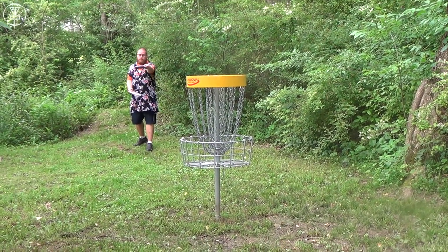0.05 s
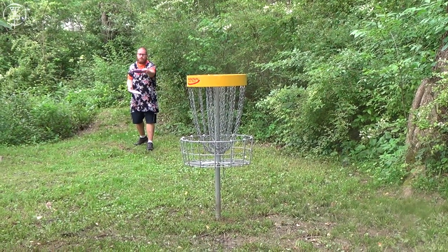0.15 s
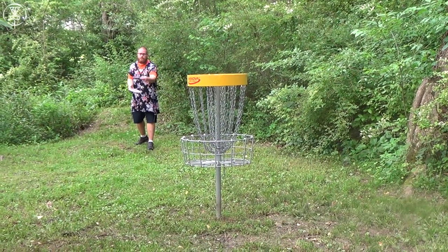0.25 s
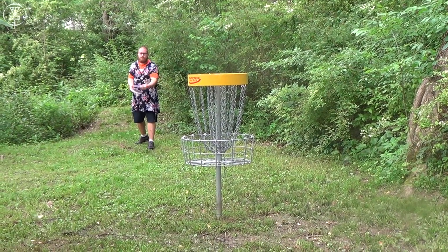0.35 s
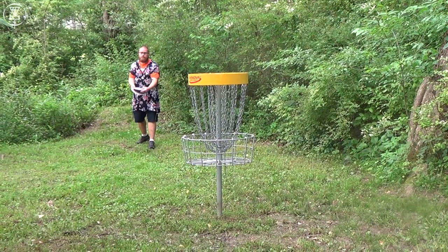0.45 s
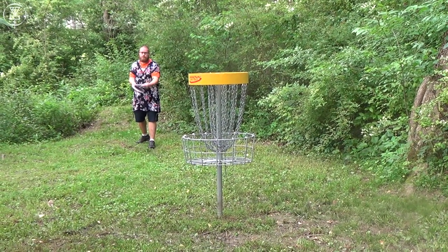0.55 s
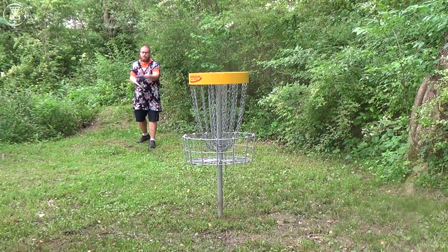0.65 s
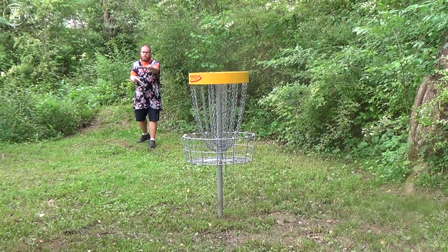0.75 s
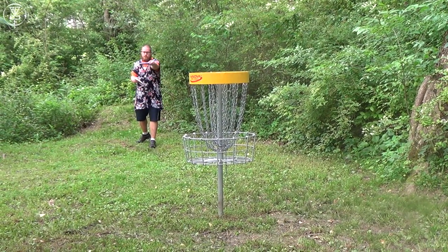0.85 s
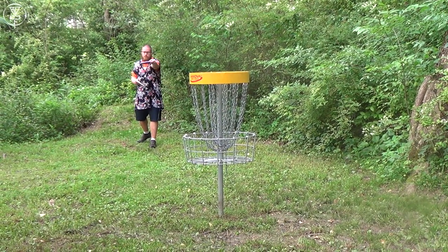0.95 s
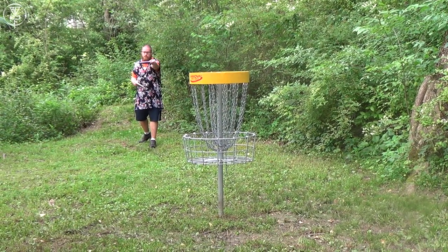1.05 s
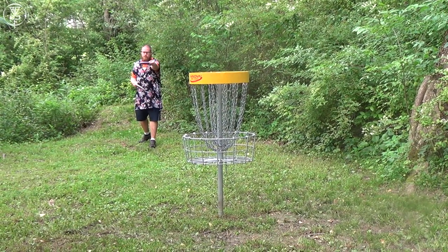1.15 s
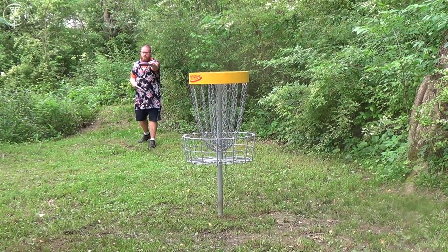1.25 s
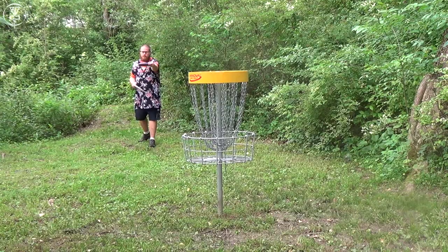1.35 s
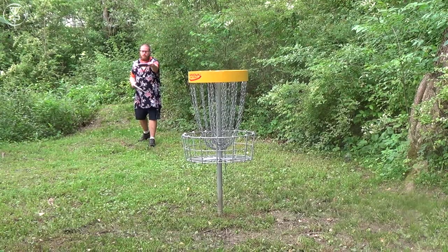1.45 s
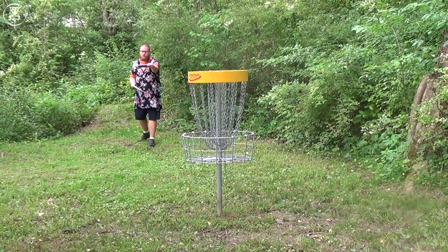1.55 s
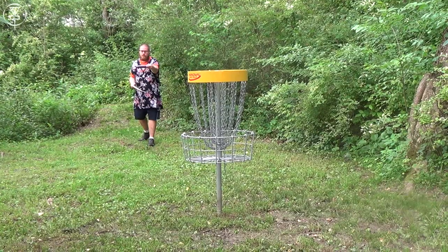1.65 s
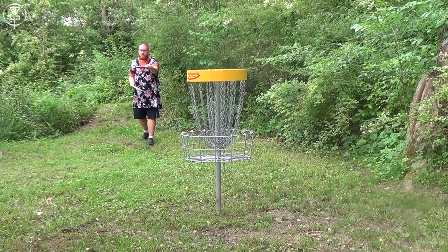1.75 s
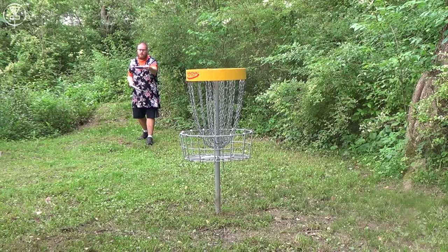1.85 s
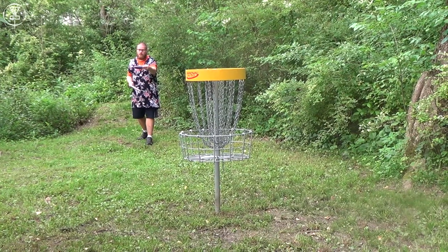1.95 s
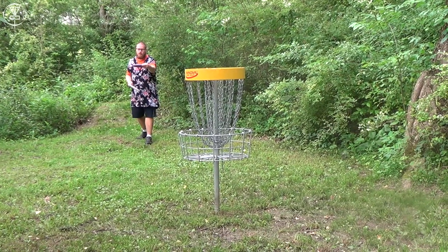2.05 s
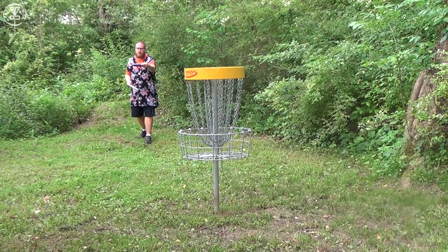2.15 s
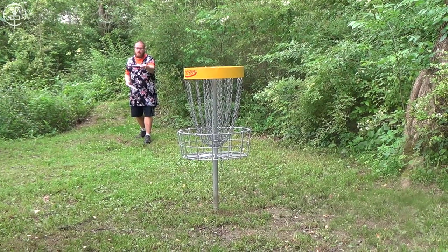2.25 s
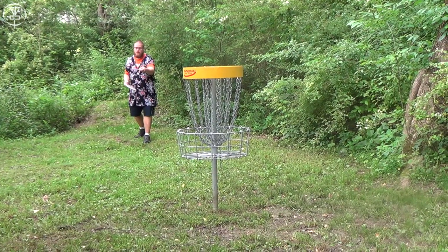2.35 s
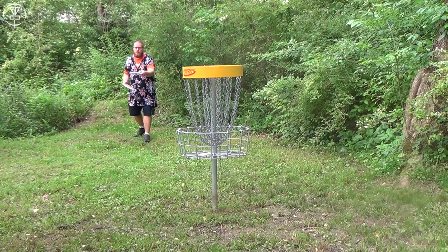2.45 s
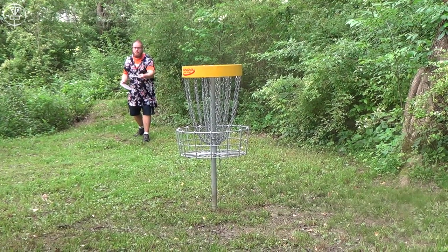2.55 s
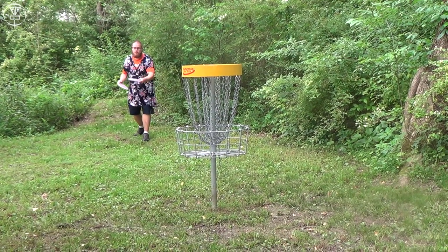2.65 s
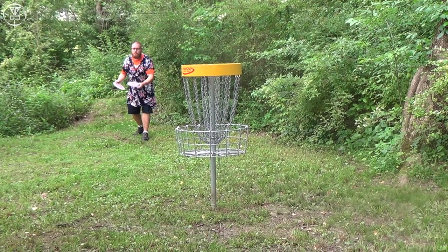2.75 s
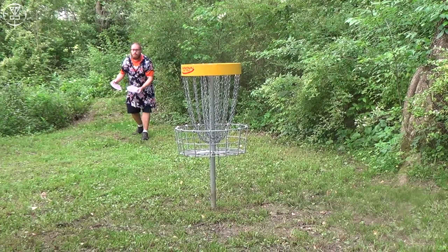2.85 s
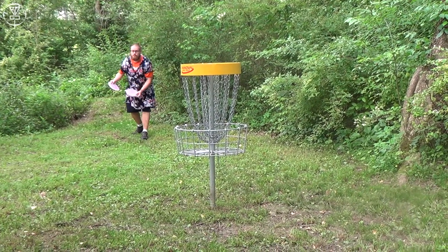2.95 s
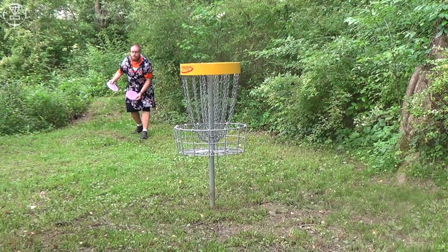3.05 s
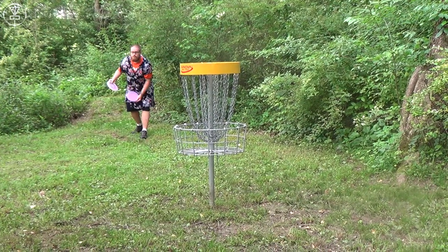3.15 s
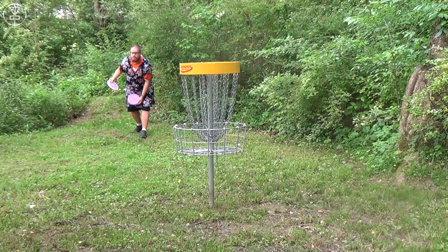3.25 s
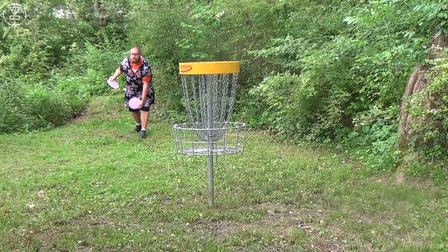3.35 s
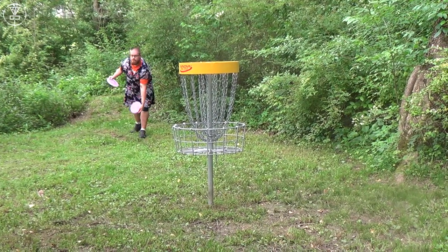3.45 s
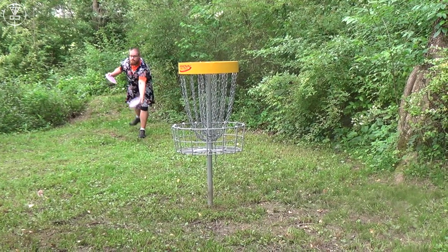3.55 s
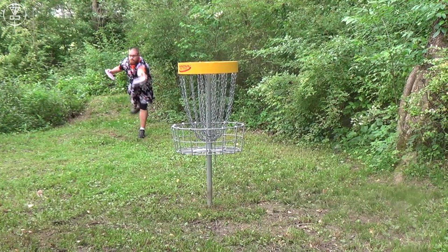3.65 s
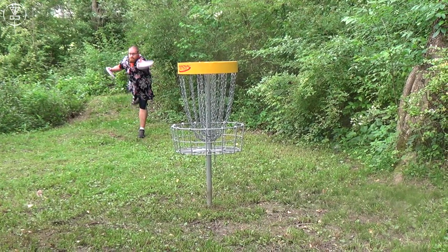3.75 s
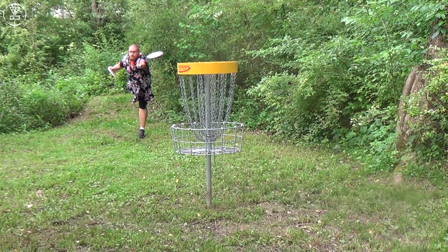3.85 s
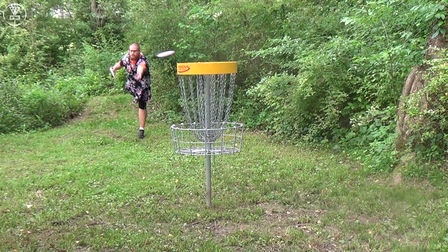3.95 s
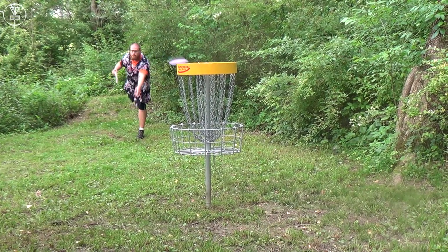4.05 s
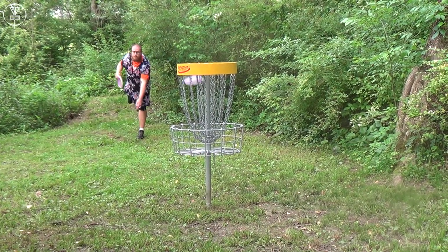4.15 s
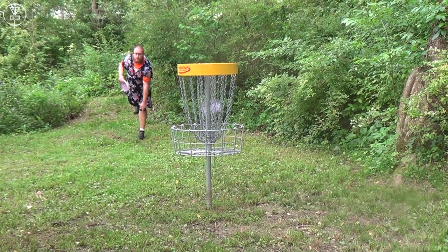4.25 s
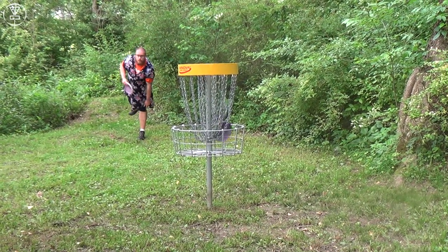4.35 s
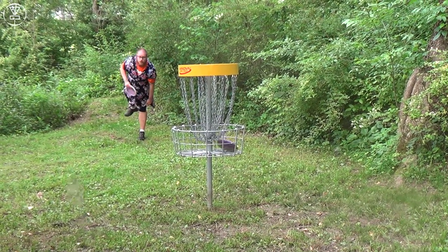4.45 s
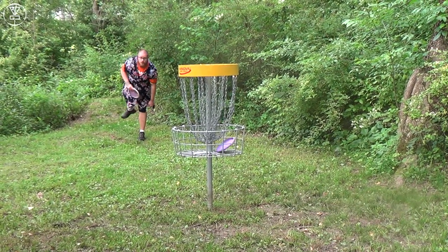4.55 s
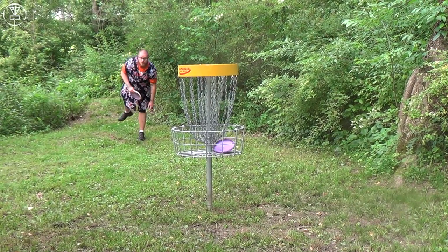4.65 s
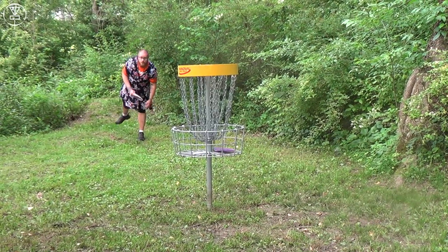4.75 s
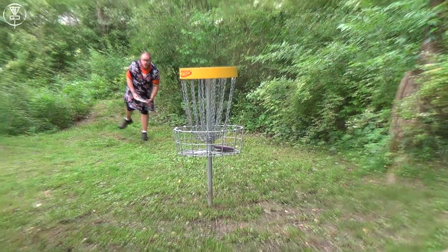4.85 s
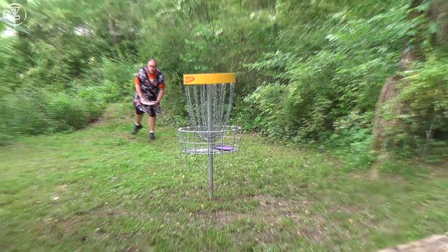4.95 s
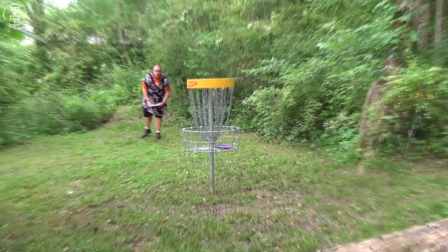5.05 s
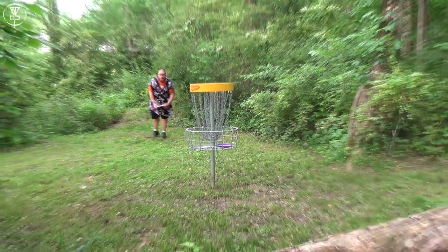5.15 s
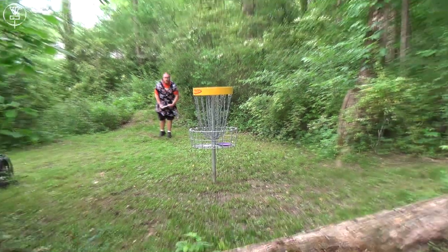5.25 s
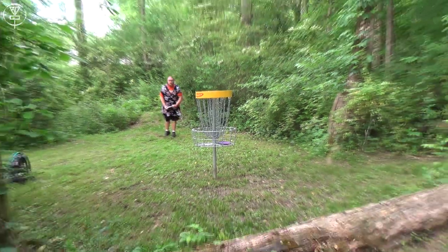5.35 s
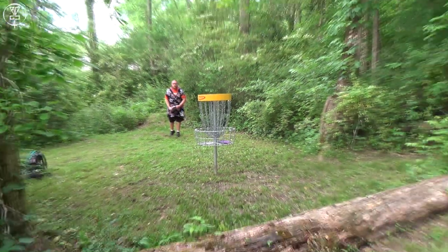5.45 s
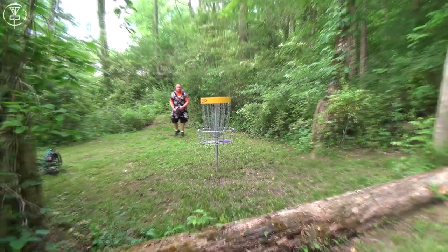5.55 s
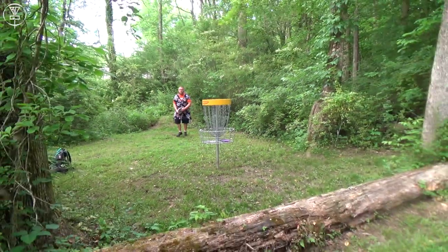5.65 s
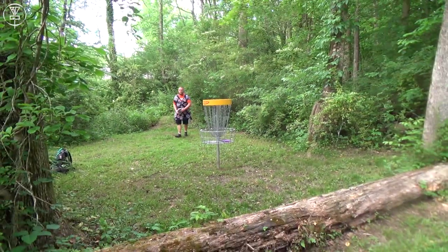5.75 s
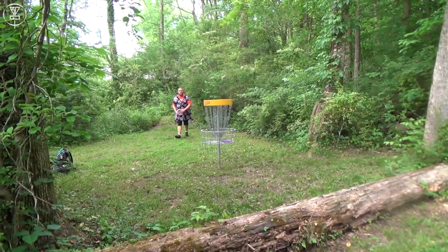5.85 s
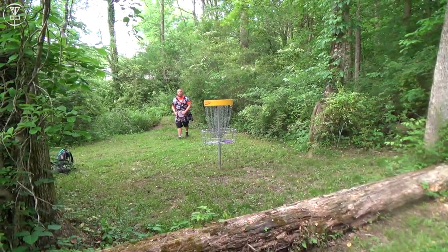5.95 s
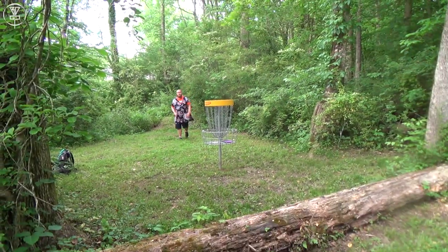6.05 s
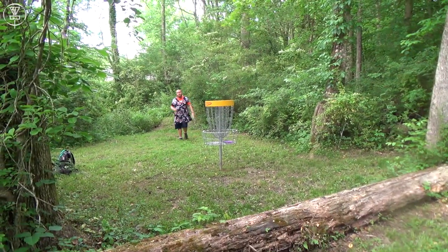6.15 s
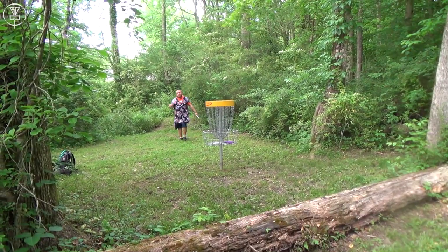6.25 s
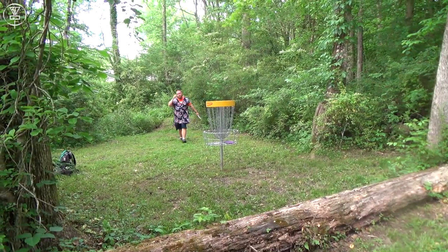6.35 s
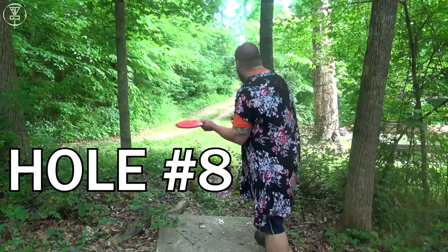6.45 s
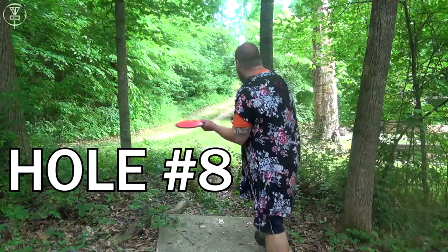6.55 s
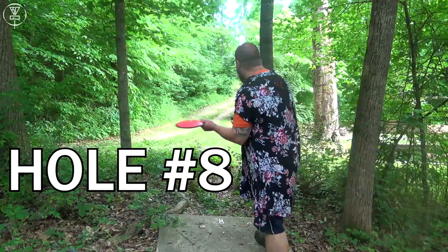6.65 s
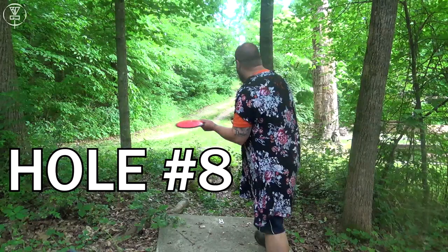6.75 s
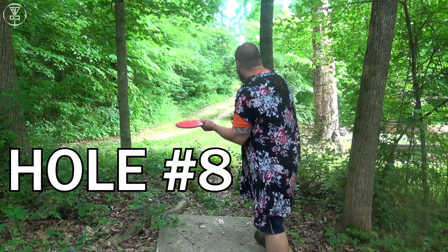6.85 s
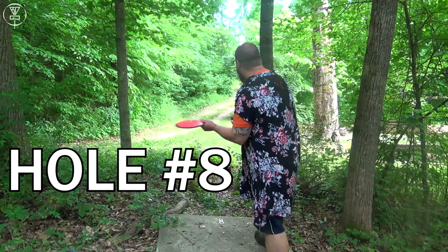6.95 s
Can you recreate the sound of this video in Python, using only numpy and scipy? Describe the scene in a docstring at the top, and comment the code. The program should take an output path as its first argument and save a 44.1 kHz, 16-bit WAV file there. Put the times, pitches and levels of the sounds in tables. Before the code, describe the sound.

Quiet woods with faint birdsong and a dry click, then a disc crashes into a chain basket, jangling brightly before the sound cuts off.

```python
"""Disc into a chain basket

A plastic disc flies into the chains of a steel basket in a wood: slaps ring the cage in many sine modes,
filtered noise knocks drop the disc into the tray, and the chains swing back, jingle and settle as
hundreds of link contacts ring decaying sines. Whistled birds, an insect drone, woodland air and a low rumble
of shaped noise surround it, with dry plastic clicks and soft scuffs close by; the sound cuts off suddenly."""
import sys
import numpy as np
from scipy import signal
from scipy.fft import rfft, irfft, next_fast_len
from scipy.io import wavfile
from scipy.ndimage import map_coordinates

SR = 44100
rng = np.random.default_rng(int(sys.argv[2]) if len(sys.argv) > 2 else 0)


def persist_wave(psi):
    """Save psi, clipped to +-1, as 16-bit WAV."""
    counts = np.round(np.clip(psi, -1, 1) * 32767).astype(np.int16)
    wavfile.write(sys.argv[1], SR, np.atleast_2d(counts).T)


N = 308700
TIME = np.arange(N) / SR
END_S, TOP_HZ = 6.5, 15750  # where the sound stops, and the top of its band

# The chains slap the pole and cage, then jostle:
# start_s, slap_db, bright_ring_db, low_ring_db, jostle_hold_s
CLASHES = [(4.369, -14.5, -16.5, -34, .05), (4.421, -22, -13.5, -24.5, 0.051),
           (4.483, -19, -19, -24.5, 0.056), (4.812, -21, -20, -37, 0.034),
           (5.083, -33.5, -21.5, -33.5, 0.056), (5.556, -37.5, -36, -38.5, .012),
           (5.62, -37, -34, -42, .025), (6.14, -35, -36.5, -37.5, .03)]


def amp(db):
    """Decibels to gain."""
    return 10 ** (np.asarray(db) / 20)


def unit(x):
    """Scale x to rms 1."""
    return x / np.sqrt(np.mean(x ** 2) + 1e-20)


def along(points, hz):
    """Read (Hz, value) points on a log frequency axis."""
    f, v = np.transpose(points)
    return np.interp(np.log(hz + 1), np.log(f + 1), v)


def over_time(points):
    """Read (seconds, value) points at every sample."""
    s, v = np.transpose(points)
    return np.interp(TIME, s, v)


def wobble(rate):
    """A smooth random curve with this many knots a second."""
    knots = rng.standard_normal(int(N * rate / SR) + 4)
    return map_coordinates(knots, [TIME * rate])


def filtered(x, response):
    """Multiply the spectrum of x by a response of frequency."""
    n = x.shape[-1]
    m = next_fast_len(n + 8192)  # spare room for the filter's tail
    return irfft(rfft(x, m) * response(np.fft.rfftfreq(m, 1 / SR)), m)[..., :n]


def hiss(spectrum, size):
    """Noise coloured by (Hz, dB) points, at rms 1."""
    return unit(filtered(rng.standard_normal(size), lambda hz: amp(along(spectrum, hz))))


def body(x, modes):
    """Ring x through resonances (Hz, width Hz, dB) of alternating sign."""
    def response(f):
        total = 0
        for k, (centre, width, db) in enumerate(modes):
            resonance = 1j * f * width / (centre * centre - f * f + 1j * f * width)
            total = total + (-1) ** k * amp(db) * resonance
        return total
    return filtered(x, response)


def fade(t, t60):
    """Exponential decay, 60 dB down after t60 seconds."""
    return np.exp(-np.log(1000) * t / t60)


def blow(x, size=176):
    """Scale a hit so that its first samples (4 ms by default) have rms 1."""
    return x / np.sqrt(np.mean(x[:size] ** 2) + 1e-20)


def add(track, s, sound):
    """Mix a sound into the track at time s."""
    part = track[round(s * SR):][:len(sound)]
    part += sound[:len(part)]


def swell(start, rise_s, hold_s, fall_db_per_s):
    """Gain that rises, holds, then falls steadily in dB."""
    age = TIME - start
    return np.clip(age / rise_s, 0, 1) * amp(-fall_db_per_s * np.maximum(age - hold_s, 0))


def jostling():
    """Bright and low ring of the chains in dB: a surge after each clash over a sway that slowly settles."""
    sway_db = [[-33], [-45]]  # bright, then low
    sway = amp(sway_db) * swell(CLASHES[0][0], rise_s=0.014, hold_s=0.85, fall_db_per_s=54)
    power = sway ** 2
    for s, _, bright, low, hold in CLASHES:
        surge = amp([[bright], [low]]) * swell(s, rise_s=0.014, hold_s=hold, fall_db_per_s=194.5)
        power = power + surge ** 2
    return 10 * np.log10(power + 1e-20)


def chains(count=64, jostle_top_db=-5, tick_db=-13, busiest=600, scatter_db=3.5, bounce_s=.004, bounce_db=-3):
    """Near-identical links ring at slightly different pitches; the harder they jostle, the more contacts."""
    # contacts that stand out of the jingle: start_s, bright_ring_db, low_ring_db, top_ring_db
    clinks = [(4.382, -14.5, -37, -23), (4.428, -15.5, -19.5, -27), (4.463, -18, -37, -26),
              (4.6013, -23.5, -41, -34), (4.7204, -28.5, -52, -31), (4.880, -26.5, -30.5, -34),
              (4.985, -30, -39, -47), (5.057, -29.5, -37, -34), (5.1335, -30, -39, -29.5),
              (5.21, -29, -56, -27), (5.2461, -27, -55, -25), (5.353, -32.5, -62, -44.5),
              (5.4206, -33.5, -51, -43), (5.461, -38, -51, -51), (5.623, -31.5, -49, -43),
              (5.8699, -37.5, -63, -36.5), (6.012, -36.5, -52, -48.5), (6.104, -46, -48, -46.5),
              (6.174, -38.5, -47, -51)]
    # modes of one link: pitch_hz, spread_between_links_hz, level_db, typical_t60_s
    link_modes = [(4380, 32, -5, .22), (5990, 90, -25.5, 0.22), (8940, 330, -16, .05),
                  (12146, 125, -1.5, 0.16), (13340, 240, -4, 0.11), (14000, 300, -15, .06)]
    # colour of link on link: pitch_hz, relative_level_db
    tick_spectrum = [(1500, -20), (3600, -20), (4800, 0), (7500, -4), (9200, -2), (11000, -1.5),
                     (12500, 1.5), (14200, -3), (15500, -17.5)]
    first_contact_db = -1.5  # the links that meet at a slap, against the slap itself

    out, t = np.zeros(N), np.arange(SR // 6) / SR
    hz, spread, mode_db, t60 = np.transpose(link_modes)
    pitches = hz + spread * rng.standard_normal((count, len(link_modes)))
    freedom = np.exp(0.34 * rng.standard_normal((count, 1, 1)))  # pinched links die sooner than loose ones
    rings = np.sin(2 * np.pi * pitches[..., None] * t)
    rings *= amp(mode_db)[:, None] * fade(t, freedom * t60[:, None])
    rings *= 1 - fade(t, 0.0035)  # the ring swells in just after the tick
    ticks = hiss(tick_spectrum, size=N)

    def contact(s, bright, low, top):
        """Two links meet with a tick, and both ring."""
        pair = rings[rng.choice(count, size=2, replace=False)].sum(axis=0)
        tick = ticks[rng.integers(N - len(t)):][:len(t)] * fade(t, 0.05)
        ring = amp([low, bright, bright, bright, top, top]) @ pair
        add(out, s, ring + amp(bright + tick_db) * tick)

    for s, bright, low, top in clinks:
        # a knock runs on through the next links, weaker each time
        delays = np.r_[0, np.cumsum(bounce_s * (.5 + rng.random(size=2)))]
        for k, delay in enumerate(delays):
            loss = k * bounce_db
            contact(s + delay, bright + loss, low + loss, top + loss)

    for s, slap, _, low, _ in CLASHES:
        contact(s, *np.add([slap, low, slap + jostle_top_db], first_contact_db))

    bright, low = jostling()
    rate = busiest * amp((bright - bright.max()) / 2) * (TIME > CLASHES[0][0])  # contacts per second
    passed = np.cumsum(rate) / SR
    slots = np.arange(int(passed[-1]))
    for i in np.searchsorted(passed, slots + rng.random(len(slots))):
        # overlapping rings share the level between them
        size = rng.normal(0, scatter_db) - 10 * np.log10(1 + rate[i] * 0.055)
        contact(TIME[i], bright[i] + size, low[i] + size, bright[i] + size + jostle_top_db)
    return out


def slips(count=190, level_db=-56, life=0.014, start_s=4.5, sway_s=1.7, settle_db=18):
    """As the chains sway, loaded links scrape in their neighbours in tiny slips, ever fewer and weaker."""
    out, t = np.zeros(N), np.arange(SR // 16) / SR
    grit = hiss([(6500, -24.0), (8400, -16), (9100, 0.5), (10800, -15.5), (11600, -13.0), (12100, 4.5),
                 (12700, -6.5), (13300, -5.0), (15000, -24.5)], size=N)
    for turn, size in rng.random((count, 2)):
        age = turn ** 1.3  # crowds the slips towards the start
        slip = grit[rng.integers(N - len(t)):][:len(t)] * fade(t, life)
        slip_db = level_db + 10 * size ** 2 + settle_db * (1 - age)
        add(out, start_s + sway_s * age, amp(slip_db) * slip)
    return out


def basket(count=300, crash_db=-4, crash_t60=0.1, steel_db=-7, steel_t60=0.99, tones_db=-16, tones_t60=1.0):
    """Each slap of chain is a short crash that leaves the wire cage ringing in many modes."""
    # strongest tones of the welded cage: pitch_hz, relative_level_db
    cage_tones = [(1660, -2), (2304, -4.5), (2848, -6), (3009, 0), (4334, -2.5), (4378, 13.5), (4856, -1.5),
                  (5459, -13.5), (5809, -8.5), (6186, -4.5), (6394, -6), (6546, -3), (6735, -5),
                  (7085, 8.5), (8479, -8), (11046, -7.5)]
    # its many weaker modes: pitch_hz, relative_level_db
    steel_spectrum = [(500, -19), (1200, -16.5), (1650, -9.5), (2300, -8.5), (3600, -12.5), (4500, -0.5),
                      (7000, 1), (7700, -3), (9000, 0.5), (11000, 3), (15000, -4.5)]
    # crash of the contact: pitch_hz, relative_level_db
    crash_spectrum = [(400, -30.5), (1500, -12), (3600, -12.5), (4300, 8.5), (5000, 5.5), (7500, -1.5),
                      (9000, -0.5), (12000, 1.5), (14000, -17.5), (15700, -9.5)]

    out, t = np.zeros(N), np.arange(SR) / SR
    weak_hz = np.linspace(550, 14500, count) + rng.normal(0, 15, count)
    tone_hz, tone_db = np.transpose(cage_tones)
    weak, strong = amp(along(steel_spectrum, weak_hz)), amp(tone_db)
    weak_gains = amp(steel_db) * weak / np.linalg.norm(weak)
    tone_gains = amp(tones_db) * strong / np.linalg.norm(strong)
    gains = np.r_[weak_gains, tone_gains]
    hz = np.r_[weak_hz, tone_hz]
    # low modes last longer
    t60 = np.r_[steel_t60 * np.sqrt(6000 / weak_hz), tones_t60 * np.sqrt(4000 / tone_hz)]
    modes = np.sin(2 * np.pi * hz[:, None] * t) * fade(t, t60[:, None])
    for s, db, *_ in CLASHES:
        # each spot favours other modes
        shares = rng.choice([-1, 1], len(hz)) * amp(rng.normal(0, 1.1, len(hz)))
        crash = amp(crash_db) * hiss(crash_spectrum, size=len(t)) * fade(t, crash_t60)
        add(out, s, amp(db) * ((gains * shares) @ modes + crash))
    return out


def disc():
    """The plastic disc slaps through the chains into the pole, then lands in the tray with a double knock."""
    # the disc's blows: start_s, level_db, scrape_t60_s, pole_ring_db
    knocks = [(4.3625, -29.5, 0.027, -34.5), (4.369, -33.5, 0.094, -33.5), (4.423, -40, 0.14, -52.5),
              (4.5399, -29, 0.0075, -57), (4.545, -33, 0.012, -60), (4.814, -40.5, 0.13, -47)]
    # the disc's resonances: pitch_hz, width_hz, relative_level_db
    disc_modes = [(604, 70, -4.5), (926, 170, -1), (1648, 230, 1), (2340, 230, -2.5), (2840, 120, -4.5)]
    # the steel pole: pitch_hz, relative_level_db, t60_s
    pole_modes = [(1680, 0, 0.16), (4890, 7.5, 0.09)]

    out, t = np.zeros(N), np.arange(SR // 4) / SR
    pole = sum(amp(db) * np.sin(2 * np.pi * hz * t) * fade(t, t60) for hz, db, t60 in pole_modes)
    for s, db, t60, pole_db in knocks:
        scrape = rng.standard_normal(len(t)) * fade(t, t60)
        knock = blow(body(scrape, disc_modes), size=220)
        add(out, s, amp(db) * knock + amp(pole_db) * pole)
    return out


def clicks():
    """A sharp snap and the very short ring of a plastic shell."""
    # dry clicks close by: start_s, body_db, snap_db, strongest_resonance_hz
    click_events = [(1.3922, -27, -35, 2680), (1.885, -52, -52, 11300), (2.273, -45, -64, 1330),
                    (2.80, -58, -47.5, 5800), (4.7938, -32.5, -43, 2700), (5.976, -39.5, -45, 1700),
                    (5.987, -39, -53.5, 1660), (6.0985, -37.5, -43, 2730), (6.377, -37.5, -33.5, 4950),
                    (6.4068, -48, -45, 1750)]
    # the clicking shell: pitch_hz, width_hz, relative_level_db
    shell_modes = [(1170, 1000, -9), (1702, 168, 2), (2700, 110, 2), (3570, 330, -3), (5700, 1060, -17.5)]
    # colour of the snap: pitch_hz, relative_level_db
    snap_spectrum = [(300, -14.5), (1000, -5), (3500, -9), (5600, 12), (7300, -1.5), (10000, 2),
                     (12000, -10), (15000, -19)]

    out, t = np.zeros(N), np.arange(SR // 20) / SR
    for s, db, snap, hz in click_events:
        favoured = np.sin(2 * np.pi * hz * t) * fade(t, 0.028)  # each click rings one mode most
        thud = blow(body(fade(t, 0.00027), shell_modes))
        shell = blow(thud + 0.76 * favoured)
        crack = blow(hiss(snap_spectrum, size=len(t)) * fade(t, 0.011))
        add(out, s, amp(db) * shell + amp(snap) * crack)
    return out


def scuff():
    """Soft low scuffs: dark noise that swells and dies around each stroke."""
    # strokes: peak_s, level_db
    scuff_strokes = [(5.315, -47.5), (5.385, -49.5)]
    stroke_s = 0.024  # time constant of both the swell and the fall
    strokes = sum(amp(db) * np.exp(-abs(TIME - s) / stroke_s) for s, db in scuff_strokes)
    return strokes * hiss([(200, -27), (290, 0), (430, -7), (650, -14), (1500, -55)], size=N)


def birds(waver=0.0088):
    """Thin, wavering whistles far off in the trees, each a sine on one smooth bend of pitch."""
    # whistles: start_s, length_s, start_hz, middle_hz, end_hz, start_level_db
    whistles = [(0.148, 0.12, 3450, 3370, 3400, -61), (.44, 0.3, 3230, 3140, 3480, -55.5),
                (2.529, 0.1, 1477, 1670, 1810, -54), (2.621, .07, 2800, 2610, 2450, -52),
                (2.692, 0.08, 3000, 3070, 3000, -56), (2.937, .29, 5380, 5270, 5570, -52),
                (3.691, 0.067, 2850, 2740, 2550, -44), (3.765, 0.056, 3040, 3200, 3050, -49)]
    rise_s, fall_db = 0.017, 9  # edge ramps, and the fade along the whole length

    out = np.zeros(N)
    for s, length, *pitches, db in whistles:
        t = np.arange(int(length * SR)) / SR
        bend = np.polyval(np.polyfit([0, length / 2, length], pitches, 2), t)
        hz = bend * (1 + waver * wobble(131.4)[:len(t)])
        sounding = np.clip(np.minimum(t, length - t) / rise_s, 0, 1)
        level = sounding * amp(db - fall_db * t / length)
        add(out, s, level * np.sin(2 * np.pi * np.cumsum(hz) / SR))
    return out


def chorus(count=26, level_db=-66, insect_db=-65, insect_hz=2680):
    """Many farther birds chirp gliding sines at random over a thin insect drone of resonant noise."""
    out, t = np.zeros(N), np.arange(SR // 8) / SR
    for when, pitch, glide, size in rng.random((count, 4)):
        hz = (1700 + 1900 * pitch) * (1 + 2.4 * (glide - .5) * t)
        chirp = np.hanning(len(t)) * np.sin(2 * np.pi * np.cumsum(hz) / SR)
        add(out, when * (END_S - len(t) / SR), amp(level_db + 8.2 * size) * chirp)
    drone = unit(body(rng.standard_normal(N), [(insect_hz, 110, 0)]))
    return out + drone * amp(insect_db + 2.6 * wobble(2.5))


def woods(x):
    """Trunks and leaves scatter a faint, short echo: noise whose treble dies first."""
    # echo decay: pitch_hz, t60_s
    echo_decay = [(200, 0.37), (3000, 0.35), (12000, 0.089)]
    hz, t, z = signal.stft(rng.standard_normal((2, SR // 2)), SR, nperseg=256)
    tail = signal.istft(z * fade(t, along(echo_decay, hz)[:, None]), SR, nperseg=256)[1]
    return signal.fftconvolve(x[None], tail / np.linalg.norm(tail[0]), axes=1)[:, :N]


def air(flutter_db=0.92):
    """Woodland air: wide coloured noise that flutters slightly, its bass leaning to the right."""
    # colour of the air: pitch_hz, relative_level_db
    air_spectrum = [(15, -45), (25, -20.5), (59, -3.5), (84, 1.5), (240, -6.5), (349, -3.5), (666, -5.5),
                    (919, -4.5), (1950, -7), (2700, -8.5), (3930, -12.5), (5430, -14), (6380, -16),
                    (10900, -17.5), (15500, -25.5)]
    # level before flutter: time_s, level_db
    air_level = [(0, -49), (4, -48.5), (5.3, -46.5)]
    # left-right likeness: pitch_hz, correlation
    likeness = [(60, 0.83), (180, 0.87), (550, 0.96), (1650, 1), (4970, 0.9), (15000, 0.98)]
    # balance: pitch_hz, left_minus_right_db
    balance = [(60, -16), (150, -7), (380, -0.5), (950, 3.5), (2380, 3), (5980, 1.5), (15000, 0.5)]

    def mid_side(hz):
        """Share the air between mid and side to give the wanted likeness."""
        turn = np.arccos(np.clip(along(likeness, hz), -1, 1)) / 2
        return amp(along(air_spectrum, hz)) * [np.cos(turn), np.sin(turn)]

    mid, side = filtered(rng.standard_normal((2, N)), mid_side)
    left_right = np.array([mid + side, mid - side])
    pair = filtered(left_right, lambda hz: amp(np.outer([.5, -.5], along(balance, hz))))
    return unit(pair) * amp(over_time(air_level) + flutter_db * wobble(5.9))


def rumble():
    """A far-off low rumble of dark noise swells and sinks, mostly on the right."""
    # level before the left-right balance: time_s, level_db
    rumble_level = [(0, -64), (1.1, -56.5), (2, -67), (4, -64.5), (5, -76)]
    low = hiss([(50, -29.5), (100, -1.5), (150, 0.5), (220, -8), (330, -4.5), (800, -28.0), (2000, -51)], size=N)
    return amp(over_time(rumble_level)) * low * amp([[-4], [2]])


def scene(echo_db=-22, bird_echo_db=-2, near_lean_db=1.0, basket_lean_db=0.05):
    """The basket stands almost straight ahead, with the wood all round."""
    target = chains() + slips() + basket() + disc()
    song = birds() + chorus()
    near = (clicks() + scuff()) * amp([[near_lean_db], [-near_lean_db]])
    echo = woods(amp(echo_db) * target + amp(bird_echo_db) * song)
    ahead = target * amp([[basket_lean_db], [-basket_lean_db]])
    return ahead + song + near + echo + air() + rumble()


def record(dry):
    """The sound stops dead, and nothing above the band limit remains."""
    gate = np.clip((END_S - TIME) / .004, 0, 1)
    return filtered(dry * gate, lambda hz: hz < TOP_HZ)


dry = scene()
out = record(dry)
persist_wave(out)
```